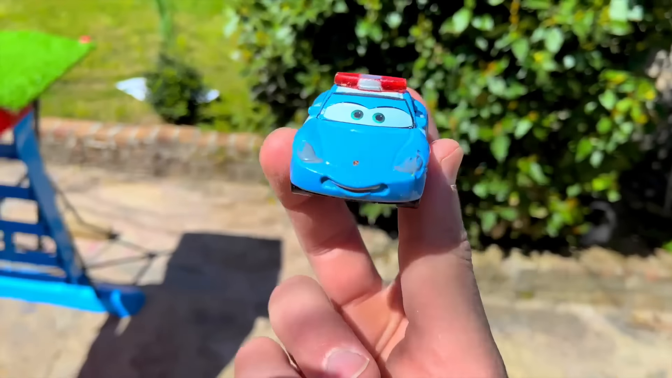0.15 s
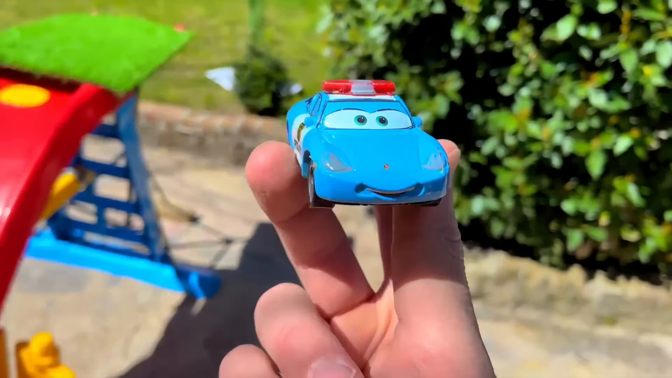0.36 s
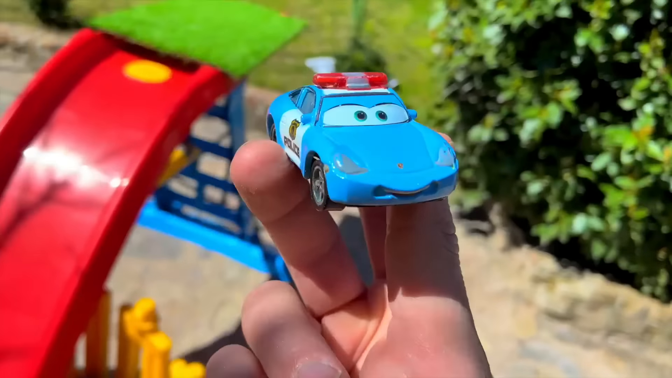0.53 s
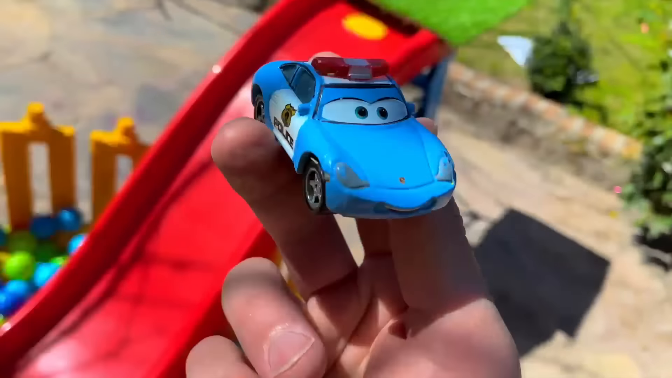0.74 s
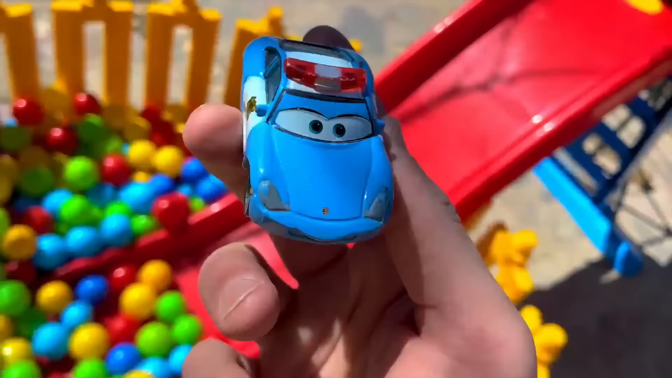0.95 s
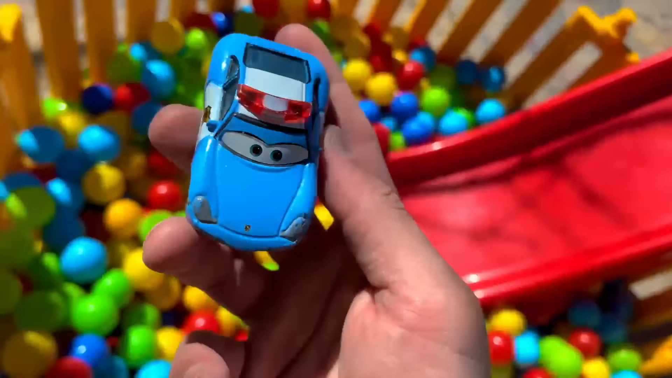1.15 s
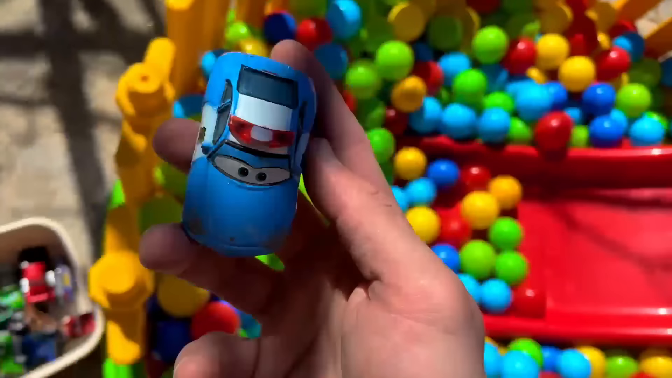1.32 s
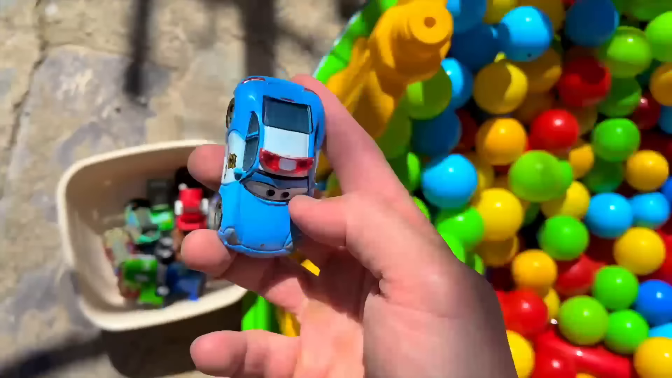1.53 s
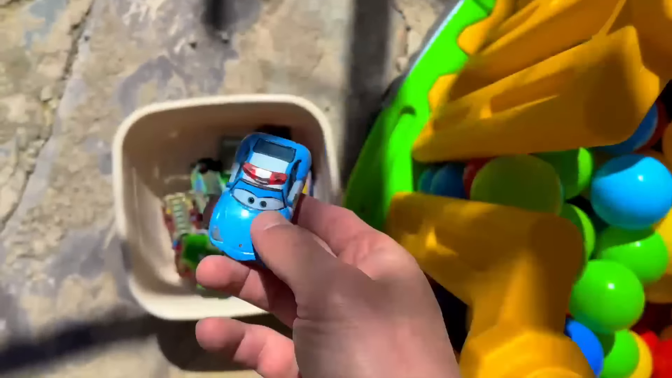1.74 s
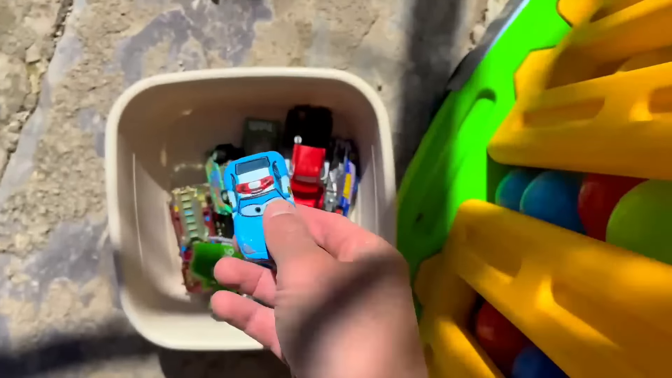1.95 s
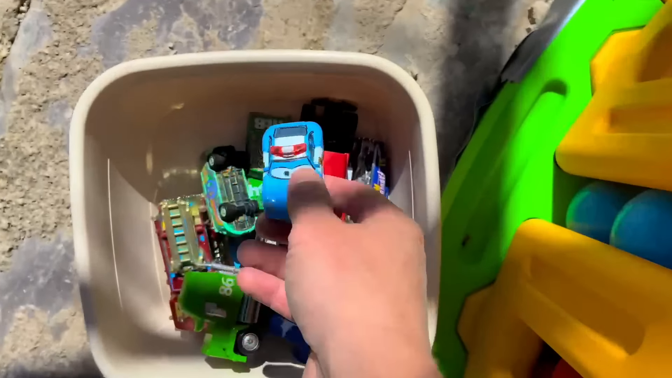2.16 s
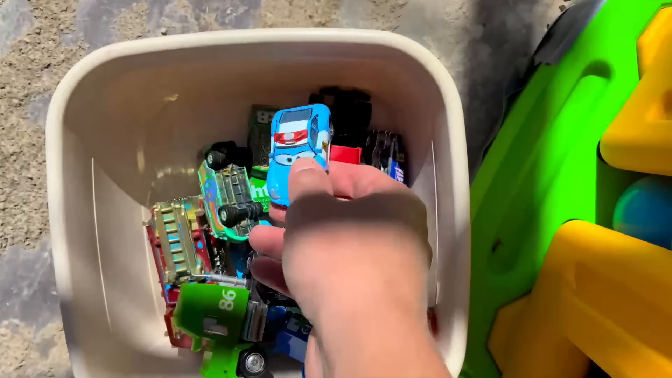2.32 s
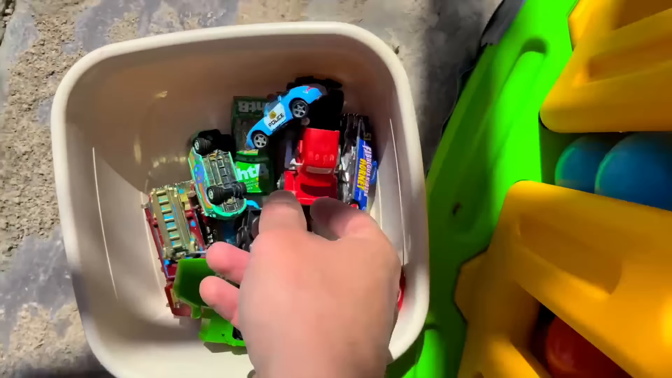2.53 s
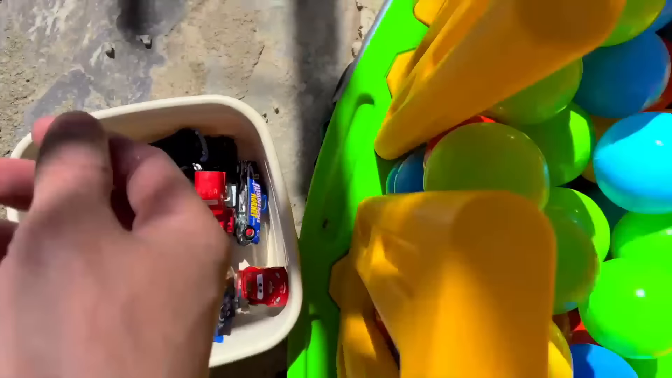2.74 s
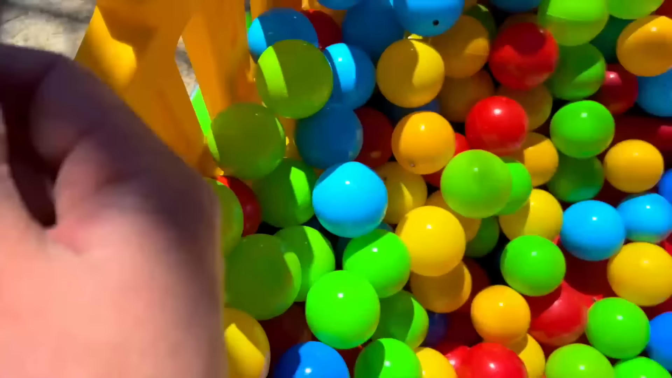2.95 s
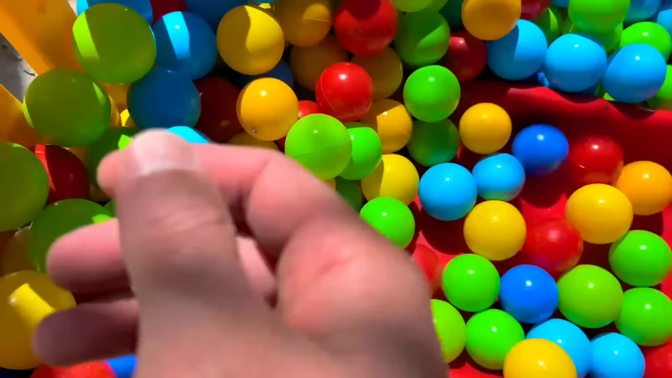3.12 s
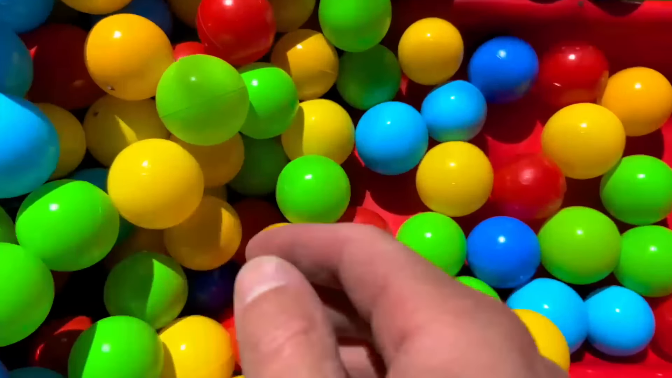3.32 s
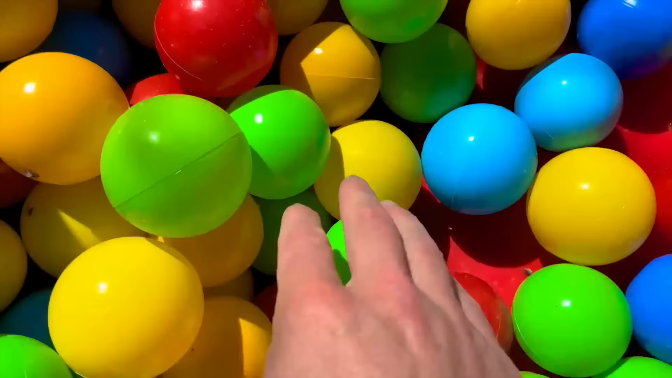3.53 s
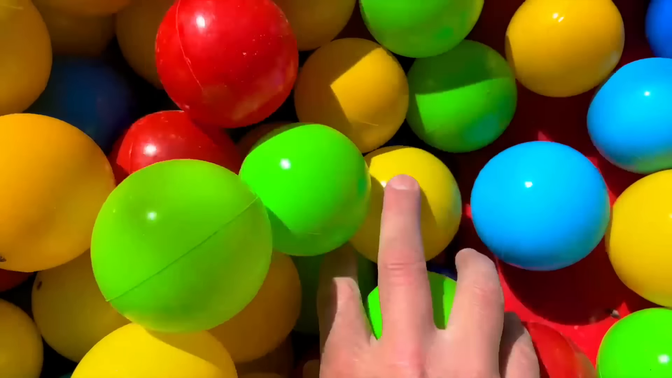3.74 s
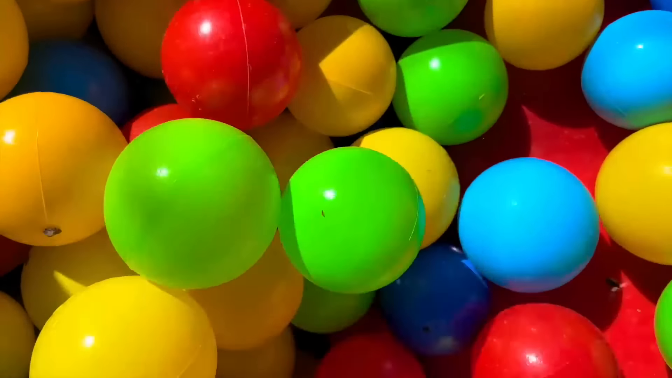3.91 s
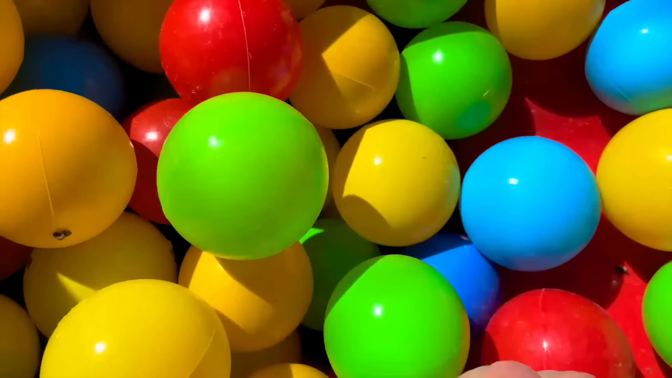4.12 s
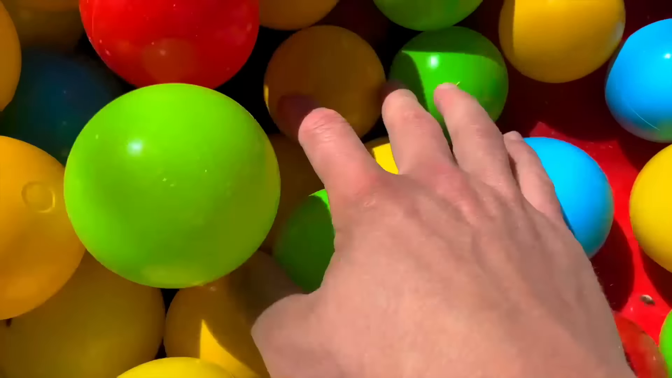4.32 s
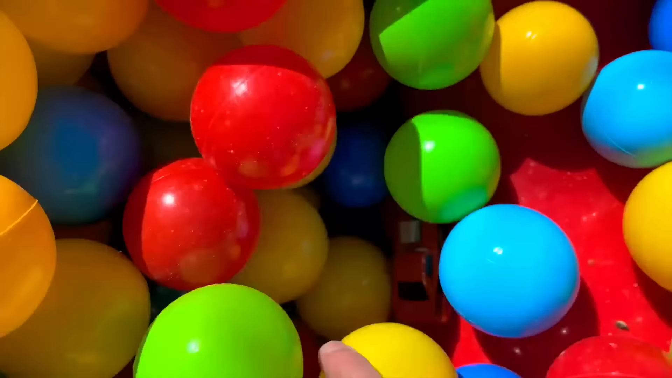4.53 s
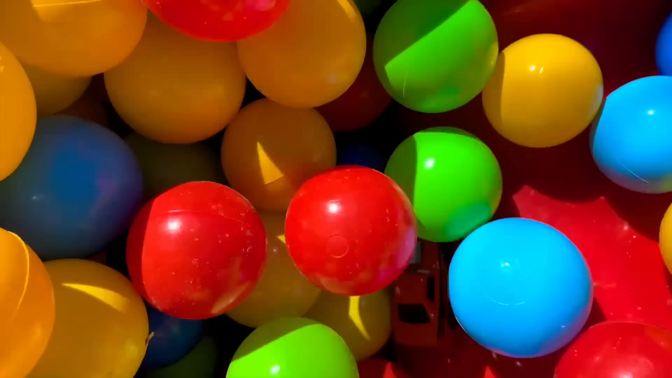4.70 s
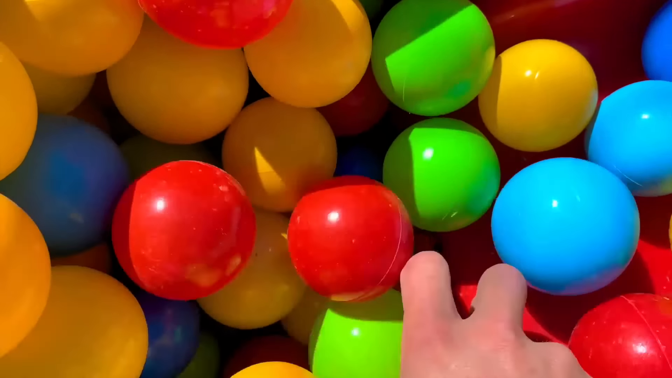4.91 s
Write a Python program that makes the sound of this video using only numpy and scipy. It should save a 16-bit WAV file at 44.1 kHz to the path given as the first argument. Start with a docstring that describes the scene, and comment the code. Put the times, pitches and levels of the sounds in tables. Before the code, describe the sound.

Quiet garden air and breeze open the scene, with a slight sleeve scuff and tiny loose-wheel clicks. A sharp metallic crack precedes a tumbling clatter in a resonant plastic tub. After a short pause comes one dull hollow fence knock with soft bumps, then continuous, irregular knocking and rolling of hollow plastic balls, heard very close, with boomy low swells.

```python
"""A die-cast toy car drops among others in a plastic tub outdoors: noise-excited cracks and decaying modes.
Before the drop the held car clicks in the fingers, as short bursts and rings.
A hand knocks the hollow fence of a ball pit, heard as modes, then digs through the plastic balls:
random collisions clatter, roll and rub, and low swelling tones boom.
Shaped noise makes the breeze, clothes and outdoor hush; gliding tones make faint chirps."""
import sys
import numpy as np
from scipy import signal
from scipy.fft import rfft, irfft, next_fast_len
from scipy.io import wavfile
from scipy.ndimage import uniform_filter1d

SR = 44100
rng = np.random.default_rng(int(sys.argv[2]) if len(sys.argv) > 2 else 0)


def inscribe(sig):
    """Save sig as 16-bit PCM at rate SR to the path in sys.argv[1].

    A 1-D sig is mono; a 2-D sig holds one channel per row.
    Samples are clipped to [-1, 1] before scaling.
    """
    pcm = np.round(np.clip(np.atleast_2d(sig).T, -1, 1) * 32767)
    wavfile.write(sys.argv[1], SR, pcm.astype(np.int16))


N = 223542
TIME = np.arange(N) / SR
RING = np.arange(SR // 4) / SR  # time axis of one struck sound

# Levels in the tables are relative: each layer's gain is applied afterwards.
# Toy car contacts in the tub: (time [s], sharp crack [dB], car body ring [dB], tub ring [dB],
# tub floor thud [dB])
CAR_HITS = [(2.15, -49.5, -60, -49, -61), (2.2598, -15.5, -16.5, -40.5, -48),
            (2.2625, -25, -27.5, -45, -46.5), (2.2852, -28.5, -55, -42.5, -44.5),
            (2.3027, -40, -49, -35, -42), (2.32, -55, -46, -41, -44), (2.372, -39.5, -63, -50, -46),
            (2.394, -54, -60, -37.5, -51.5), (2.403, -49.5, -55, -40, -52.5),
            (2.4166, -32.5, -50, -47.5, -47.5), (2.4425, -31.5, -54.5, -57.5, -44),
            (2.471, -44, -48, -41, -39.5), (2.5215, -50, -48.5, -44, -44), (2.5553, -9, -13, -4.5, -29.5),
            (2.5671, -20.5, -26.5, -14.5, -30), (2.5836, -43, -32.5, -28.5, -33.5),
            (2.593, -42.5, -34, -32.5, -37), (2.6068, -27.5, -26.5, -16, -33),
            (2.6162, -15, -23.5, -13, -23.5), (2.6301, -20.5, -22, -23, -27),
            (2.6345, -28.5, -26, -22.5, -34), (2.642, -24.5, -35, -25, -32.5),
            (2.654, -31, -42.5, -30, -38), (2.6728, -32, -41, -27, -36), (2.677, -32, -46.5, -20.5, -43),
            (2.6844, -24, -30.5, -22.5, -37.5), (2.7275, -40, -48, -22.5, -38),
            (2.7941, -42, -53, -24.5, -37.5), (2.7986, -31, -33.5, -29, -33.5)]
# Spectrum of a sharp crack: (frequency [Hz], density [dB per Hz])
CRACK = [(300, -21), (1500, -16), (2500, -6), (4800, 4.5), (6000, -8.5), (8200, 9.5), (9800, -4),
         (11300, -3.5), (15500, -2)]
# Spectrum of hollow ball shells knocking: (frequency [Hz], density [dB per Hz])
SHELL = [(150, -4), (450, 3.5), (650, 0), (1000, 1), (1280, -4), (1500, -6.5), (2200, -5.5), (3000, -14.5),
         (4300, -18.5), (8000, -20.5), (16000, -43.5)]
# Spectrum of balls rubbing and ticking: (frequency [Hz], density [dB per Hz])
RUB = [(500, -36), (2000, 3.5), (3500, -0.5), (5000, -4.5), (7600, -1.5), (9800, -3), (14000, -3.5),
       (15600, -3)]


def amp(db):
    """Level to amplitude ratio: 20 dB is a factor of ten."""
    return 10 ** (np.asarray(db) / 20)


def unit(x):
    """Normalisation to a root-mean-square value of 1."""
    return x / np.sqrt(np.mean(x ** 2) + 1e-20)


def read(points, hz):
    """Interpolation of a table along a logarithmic frequency axis."""
    f, value = np.transpose(points)
    return np.interp(np.log(hz + 1), np.log(f + 1), value)


def add(mix, s, sound):
    """Superposition: a sound joins the mix from time s."""
    part = mix[:, round(s * SR):][:, :sound.shape[-1]]
    part += sound[..., :part.shape[-1]]


def colour(pair, spectrum):
    """Minimum-phase filtering at unit power gain, with partial coherence between the two channels."""
    # Left-right likeness: (frequency [Hz], correlation [-])
    likeness = [(50, .8), (110, .87), (200, .96), (350, .84), (640, .58), (1400, .55), (3000, .5),
                (6000, .5), (7800, .93), (16000, .97)]
    size = next_fast_len(N + SR // 4, True) // 2 * 2
    hz = abs(np.fft.fftfreq(size, 1 / SR))
    log_gain = np.log(unit(amp(read(spectrum, hz))))
    causal_filter = np.exp(np.conj(signal.hilbert(log_gain)))
    a, b = np.fft.fft(pair, size) * causal_filter
    same = np.clip(read(likeness, hz), -1, 1)
    mid = a * np.sqrt((1 + same) / 2)
    side = b * np.sqrt((1 - same) / 2)
    return np.fft.ifft([mid + side, mid - side]).real[:, :N]


def noise():
    """White noise: two uncorrelated Gaussian channels."""
    return rng.standard_normal((2, N))


def wobble(per_s):
    """Band-limited random modulation of rms 1: per_s random values a second, joined by lines."""
    knots = rng.standard_normal(N // 20)
    return unit(np.interp(TIME * per_s, np.arange(len(knots)), knots))


def bursts(times, levels_db, spectrum, t60, tail_db, tail_t60):
    """High modal density: a blow excites crowded short modes, and nearby walls scatter a weaker tail."""
    out = np.zeros((2, N))
    direct = amp(-60 * RING / t60)
    tail = amp(tail_db - 60 * RING / tail_t60)
    fall = np.hypot(direct, tail) * (1 - np.exp(-RING / .0005))
    for s, db in zip(times, levels_db):
        add(out, s, amp(db) * fall * rng.standard_normal((2, len(RING))))
    return colour(out, spectrum)


def rings(times, levels_db, modes, spread, spot_db):
    """Modal synthesis: each blow lands on another spot and weights the decaying modes anew."""
    hz, mode_db, t60 = np.transpose(modes)[:, :, None]
    envelope = amp(mode_db - 60 * RING / t60) * (1 - np.exp(-RING / .0009))
    decay = envelope * np.exp(2j * np.pi * hz * RING)
    out = np.zeros((2, N))
    for s, db in zip(times, levels_db):
        weight, phase, skew = rng.standard_normal((3, len(modes)))
        angle = np.pi * phase + spread * np.outer([1, -1], skew)  # skew parts the channels
        spot = amp(db) * unit(amp(spot_db * weight)) * np.exp(1j * angle)
        add(out, s, (spot @ decay).imag)
    return out


def thumps(rows, swell_s, lead_s, tail_db, tail_t60):
    """Damped oscillation: a tone swells and dies under a critically damped pulse with a weaker tail."""
    out = np.zeros((2, N))
    u = RING / swell_s
    swell = (u * np.exp(1 - u)) ** 2
    tail = amp(tail_db - 60 * RING / tail_t60) * (1 - np.exp(-u))
    for s, db, hz in rows:
        add(out, s - lead_s, amp(db) * (swell + tail) * np.sin(2 * np.pi * hz * RING))
    return out


def patter(per_s, size_db, fall_s, tone, low_hz, high_hz, count=24):
    """Random point process: collisions of random size, each a click with one of count pitches."""
    out = np.zeros((2, N))
    t = RING[:len(RING) // 4]
    happens = rng.random(N) < per_s / SR
    sizes = amp(size_db * np.minimum(rng.exponential(1, N), 3)) * happens
    pitch = rng.integers(0, count, N)
    tone_fall = amp(-30 * t / fall_s)  # 30 dB in fall_s; the click falls 90 dB
    click_fall = amp(-90 * t / fall_s)
    for k, hz in enumerate(np.geomspace(low_hz, high_hz, count)):
        ring = np.sin(2 * np.pi * (hz * t + rng.random((2, 1))))
        clack = rng.standard_normal((2, len(t))) * click_fall + tone * ring * tone_fall
        out += signal.oaconvolve((sizes * (pitch == k))[None], clack, axes=1)[:, :N]
    slow_power = uniform_filter1d(np.mean(out ** 2, 0), size=4000)
    return unit(out / np.sqrt(slow_power + 1e-9))  # slow level changes evened out


def strokes(starts, lengths, attack_s, release_s):
    """Movement envelopes: a linear attack, a hold, and an exponential release."""
    t = TIME - starts[:, None]
    release = np.exp(-np.maximum(t - lengths[:, None], 0) / release_s)
    return np.clip(t / attack_s, 0, 1) * release


def together(levels_db, envelopes):
    """Incoherent summation: overlapping movements add in power."""
    return np.sqrt(amp(levels_db) ** 2 @ envelopes ** 2)


def toy_cars():
    """Impact excitation: metal cars crack together, their bodies and small parts ring, others rattle."""
    # Axles, wheels and trim: (frequency [Hz], level [dB], T60 [s])
    trim_modes = [(2156, -5.5, 0.051), (5440, -7, 0.031), (5630, -2.5, 0.027), (5880, -4, 0.042),
                  (6240, -1.5, .028), (6970, -6.5, 0.067), (7870, -12, 0.073), (10900, -12.5, .042),
                  (13640, -13, .035)]
    # Car body: (frequency [Hz], level [dB], T60 [s])
    car_modes = [(2260, -8, 0.036), (2950, -18, 0.073), (3400, -12, 0.05), (3620, -9.5, 0.06),
                 (3690, 1, 0.047), (4100, -21, 0.079), (4220, -8, 0.054)]
    # Crowded short modes of the other cars: (frequency [Hz], density [dB per Hz])
    car_rattle = [(500, -32.5), (2300, -12), (2900, -6), (3650, 7.5), (4200, -7.5), (4800, -16.5),
                  (16000, -46)]
    s, crack_db, car_db, _, _ = np.transpose(CAR_HITS)
    crack = amp(-3) * bursts(s, crack_db, CRACK, t60=.028, tail_db=-22, tail_t60=.16)
    trim = amp(-8) * rings(s, crack_db, trim_modes, spread=.3, spot_db=3)
    bodies = amp(-1) * rings(s, car_db, car_modes, spread=1, spot_db=1)
    jolted = amp(-8) * bursts(s, car_db, car_rattle, t60=.03, tail_db=-16, tail_t60=.14)
    return crack + trim + bodies * amp([[-5], [3]]) + jolted  # bodies stronger on the right


def tub():
    """Panel vibration: the plastic tub rings, rattles and thuds under the tumbling car."""
    # Tub: (frequency [Hz], level [dB], T60 [s])
    tub_modes = [(350, -11.5, 0.035), (540, -22, 0.12), (700, -22, 0.1), (972, -19.5, 0.12),
                 (1032, -16, 0.058), (1288, -8, 0.058), (1327, -7.5, 0.075), (1407, -15.5, 0.058),
                 (1715, -3, 0.028), (1780, -6.5, 0.045), (1900, -4, 0.028), (2254, 0, 0.025),
                 (2584, -7, 0.036)]
    # Hollow knocks of walls and floor, each panel with its own note: (time [s], level [dB], frequency [Hz])
    tub_knocks = [(2.556, -25.5, 351), (2.5845, -27, 1120), (2.618, -17.5, 655), (2.619, -22, 1016),
                  (2.626, -18.5, 236), (2.633, -36, 600), (2.635, -22, 250), (2.653, -27.5, 670),
                  (2.675, -27, 263), (2.676, -26.5, 1007), (2.729, -30.5, 1040), (2.797, -30.5, 663)]
    # Rattle of the tub: (frequency [Hz], density [dB per Hz])
    tub_body = [(40, -46), (200, -20), (700, -21), (1300, -5), (2100, -1), (2800, -12), (4500, -13.5),
                (9000, -22.5), (16000, -44)]
    # Thud of its floor: (frequency [Hz], density [dB per Hz])
    tub_floor = [(30, -43.5), (100, -10.5), (190, 4.5), (280, 1.5), (400, -4.5), (600, -0.5), (900, -8.5),
                 (2000, -32), (16000, -77)]
    s, _, _, tub_db, thud_db = np.transpose(CAR_HITS)
    ring = amp(-2.8) * rings(s, tub_db, tub_modes, spread=.5, spot_db=2.5)
    panels = thumps(tub_knocks, swell_s=.002, lead_s=0, tail_db=-10.5, tail_t60=.1)
    rattle = amp(-5) * bursts(s, tub_db, tub_body, t60=.03, tail_db=-17, tail_t60=.3)
    thud = bursts(s, thud_db, tub_floor, t60=.081, tail_db=-12.5, tail_t60=.42)
    return ring + panels + rattle + thud


def dragged_car():
    """Stick-slip friction: the held car scrapes and catches on the others, and the tub floor groans."""
    # Drags: (start [s], length [s], level [dB])
    drags = [(2.257, 0.033, -40), (2.297, 0.048, -47.5), (2.349, 0.1, -46.5), (2.464, 0.071, -50),
             (2.546, 0.0043, -30)]
    # Brief ringing catches: (time [s], level [dB], frequency [Hz])
    catch_rows = [(2.282, -45.5, 2110), (2.301, -47, 2950), (2.311, -44, 2950), (2.32, -43.5, 2950),
                  (2.332, -54, 2940), (2.381, -46, 1570), (2.387, -50.5, 3030), (2.392, -33.5, 1680),
                  (2.403, -38.5, 1900), (2.404, -42.5, 2240), (2.418, -48.5, 2470), (2.473, -33.5, 2050),
                  (2.477, -41, 1690), (2.486, -48.5, 2094), (2.499, -48.5, 1230), (2.521, -39, 1730),
                  (2.549, -34, 3130)]
    # Scrape: (frequency [Hz], density [dB per Hz])
    scrape_colour = [(200, -7.5), (400, 2.5), (540, 10.5), (720, -15), (1000, 1), (1300, -8.5),
                     (1700, -4.5), (2200, -7), (2600, -6), (2950, -1.5), (3400, -11), (4500, -6),
                     (7300, -13), (9500, -16), (13000, -19.5), (15500, -16)]
    # Groan of the tub floor: (frequency [Hz], density [dB per Hz])
    tub_groan = [(100, -14.5), (280, -3), (400, -9.5), (530, 4.5), (680, -10), (1100, -19.5), (4000, -38.5)]
    start, length, drag_db = np.transpose(drags)
    dragging = together(drag_db, strokes(start, length, attack_s=.0088, release_s=.0051))
    slips = patter(per_s=1300, size_db=2.2, fall_s=.028, tone=.3, low_hz=1600, high_hz=3100)
    scrape = amp(-3) * colour(slips, scrape_colour) * dragging
    judder = patter(per_s=500, size_db=2, fall_s=.03, tone=.2, low_hz=300, high_hz=700, count=8)
    groan = amp(-8) * colour(judder, tub_groan) * dragging
    catches = thumps(catch_rows, swell_s=.002, lead_s=0, tail_db=-3.5, tail_t60=.07)
    stick_slip = 1 + .55 * wobble(420)
    return scrape + groan + catches * stick_slip


def handling():
    """Damped impacts: loose wheels click as the car turns in the fingers, which damp its chassis."""
    # Clicks: (time [s], dry tick [dB], axle ring [dB], chassis [dB])
    hand_clicks = [(.752, -47, -75, -59), (.812, -41, -75, -51), (1.1198, -75, -78, -43),
                   (1.456, -39, -56, -44), (1.471, -40.5, -62, -42.5), (1.545, -35, -44, -50),
                   (1.5532, -24, -29, -32), (1.651, -58, -66, -52), (1.674, -40.5, -60, -48),
                   (1.735, -50, -56, -43), (1.805, -40, -74, -47), (2.0184, -40, -48.5, -47)]
    # Wheels and axles: (frequency [Hz], level [dB], T60 [s])
    axle_modes = [(2155, -2.5, 0.04), (5290, -4, 0.019), (6090, 1, 0.028), (6700, 1, .014),
                  (7230, 1, 0.027), (7700, 2, 0.027), (8800, 5, 0.02)]
    # Damped chassis: (frequency [Hz], density [dB per Hz])
    chassis_colour = [(300, -13), (1000, -11), (1600, -2), (2150, 5.5), (2900, -5.5), (3600, -17),
                      (6000, -26), (16000, -40)]
    s, tick_db, axle_db, chassis_db = np.transpose(hand_clicks)
    ticks = bursts(s, tick_db, CRACK, t60=.017, tail_db=-26, tail_t60=.1)
    axles = rings(s, axle_db, axle_modes, spread=.3, spot_db=2)
    chassis = bursts(s, chassis_db, chassis_colour, t60=.022, tail_db=-22, tail_t60=.12)
    return amp(-3) * (ticks + axles + chassis)


def ball_sweeps():
    """Many-body collisions: light hollow balls clatter, roll, rub and boom as the hand digs."""
    # Sweeps of the hand: (start [s], length [s], boom [dB], clatter [dB], rolling [dB], rubbing [dB])
    sweep_rows = [(3.597, 0.074, -31.5, -47.5, -51, -42), (3.73, 0.15, -34, -47, -42, -39),
                  (3.789, 0.11, -19.5, -37, -44, -38), (3.893, 0.058, -25, -39, -46, -38.5),
                  (4.017, 0.14, -26.5, -44, -54, -53), (4.225, 0.051, -26.5, -46.5, -43, -65),
                  (4.271, 0.094, -28, -42.5, -42, -38), (4.333, 0.14, -23, -36.5, -36.5, -35.5),
                  (4.46, 0.078, -21, -32, -37.5, -36.5), (4.518, 0.045, -25.5, -36, -36, -38.5),
                  (4.55, 0.19, -28.5, -41.5, -45.5, -45), (4.728, 0.064, -24, -34.5, -48, -39),
                  (4.805, 0.065, -24, -47, -44, -50), (4.858, 0.095, -20.5, -39.5, -44, -37.5),
                  (4.964, 0.088, -32.5, -42.5, -42.5, -43)]
    # Balls still shifting once disturbed: boom, clatter, rolling, rubbing [dB]
    settle_db = [-36, -60, -48.5, -50]
    # A ball skids drily against its neighbour: (start [s], length [s], level [dB])
    skid_rows = [(3.809, .012, -32.5), (3.96, 0.0088, -41), (4.269, 0.036, -35.5), (4.982, 0.007, -39)]
    # Boom of the heap: (frequency [Hz], density [dB per Hz])
    heap_colour = [(50, -30), (120, -11), (180, -3.5), (220, -3.5), (280, -8), (400, -11.5), (600, -28.5),
                   (1200, -26), (4000, -66)]
    # Shell rolling on shell: (frequency [Hz], density [dB per Hz])
    roll_colour = [(200, -35), (500, 16.5), (800, -2), (1300, -1), (1700, 0), (2200, 0.5), (3100, 0.5),
                   (4000, -13), (8000, -20), (16000, -54)]
    start, length, *levels_db = np.transpose(sweep_rows)
    sweeps = strokes(start, length, attack_s=.027, release_s=.028)
    disturbed = np.maximum.accumulate(sweeps[0])  # stays up after the first sweep
    boom, clatter, roll, rub = (np.hypot(together(db, sweeps), disturbed * amp(rest_db))
                                for db, rest_db in zip(levels_db, settle_db))
    skid_at, skid_length, skid_db = np.transpose(skid_rows)
    skids = together(skid_db, strokes(skid_at, skid_length, attack_s=.0037, release_s=.005))

    jostle = patter(per_s=500, size_db=1.5, fall_s=.043, tone=.064, low_hz=166, high_hz=326)
    knocks = patter(per_s=560, size_db=2, fall_s=.022, tone=1, low_hz=380, high_hz=2600)
    seams = patter(per_s=1100, size_db=2.1, fall_s=.015, tone=.8, low_hz=900, high_hz=3400)
    slips = patter(per_s=3100, size_db=3.5, fall_s=.025, tone=.55, low_hz=2644, high_hz=8010)
    heap = amp(-2.5) * boom * colour(jostle, heap_colour)
    clattering = amp(-3) * clatter * colour(knocks, SHELL)
    rolling = amp(-2.5) * roll * colour(seams, roll_colour)
    friction = amp(-.5) * np.hypot(rub, skids) * colour(slips, RUB)
    return heap * amp([[-1.7], [1.3]]) + (clattering + rolling) * amp([[-.9], [.9]]) + friction


def heap_shoves():
    """Low-frequency pulses: heavy shoves make the heap of balls boom, swelling and dying alike."""
    # Shoves: (time [s], level [dB], frequency [Hz])
    booms = [(3.649, -8.5, 202.5), (3.682, -15.5, 182), (3.822, -5.5, 208), (3.849, -14, 252),
             (3.982, -4.5, 216), (4.041, -9.5, 224), (4.076, -8.5, 225), (4.15, -8, 241), (4.358, -13, 222),
             (4.393, -8, 188), (4.491, -6.5, 212), (4.61, -10.5, 190), (4.76, -8.5, 221),
             (4.832, -11.5, 191), (4.885, -8, 181), (4.922, -7, 220), (4.941, -8, 194), (4.994, -14, 238)]
    shoves = thumps(booms, swell_s=.0061, lead_s=.0018, tail_db=-28, tail_t60=.1)
    return amp(-6.5) * shoves * amp([[-1.7], [1.3]])


def ball_clacks():
    """Shell resonance: single balls clack with a sharp tick and a hollow note of their own."""
    # Clacks: (time [s], sharp tick [dB], hollow shell [dB], shell pitch [Hz])
    clack_rows = [(3.604, -47, -37, 990), (3.611, -35.5, -38, 1104), (3.6825, -43, -30, 793),
                  (3.7465, -35, -32.5, 960), (3.763, -41, -42, 1900), (3.7801, -42, -31, 2070),
                  (3.816, -26, -27.5, 1230), (3.832, -38, -22.5, 1140), (3.877, -24, -24.5, 860),
                  (3.935, -38, -35, 1050), (3.9591, -21, -28.5, 1530), (3.979, -46, -26.5, 810),
                  (4.0352, -50, -35, 493), (4.0483, -30.5, -31.5, 1043), (4.116, -18.5, -52, 2620),
                  (4.128, -45, -38, 2660), (4.147, -23, -23, 1244), (4.1495, -29, -35, 1840),
                  (4.233, -31, -32, 920), (4.2448, -25.5, -29.5, 1270), (4.253, -38, -31.5, 1090),
                  (4.263, -48, -40, 1800), (4.28, -37, -39, 1300), (4.305, -30, -27.5, 1220),
                  (4.319, -42, -35, 1090), (4.351, -33, -27, 1220), (4.3564, -30, -23, 835),
                  (4.398, -41, -34, 1010), (4.415, -41, -31, 1230), (4.465, -26, -27, 1140),
                  (4.474, -36, -37, 2780), (4.4909, -27, -34, 944), (4.502, -38, -21.5, 1314),
                  (4.547, -39, -29.5, 2770), (4.553, -37, -30, 1140), (4.594, -30, -29.5, 920),
                  (4.607, -45, -34, 700), (4.63, -36, -29, 2070), (4.7301, -31, -23.5, 1090),
                  (4.772, -23.5, -28, 1000), (4.782, -30, -35, 1190), (4.8351, -25, -36, 993),
                  (4.877, -30, -26, 1584), (4.921, -34, -33, 1100), (4.941, -31.5, -24, 931),
                  (4.9463, -23, -23, 850), (4.99, -20, -26, 1490), (5.009, -46, -27.5, 1000)]
    at, tick_db, shell_db, shell_hz = np.transpose(clack_rows)
    ticks = amp(-2.5) * bursts(at, tick_db, RUB, t60=.02, tail_db=-19, tail_t60=.08)
    clacks = amp(5) * bursts(at, shell_db, SHELL, t60=.022, tail_db=-22, tail_t60=.09)
    notes = zip(at, shell_db, shell_hz)
    pocks = amp(1) * thumps(notes, swell_s=.00078, lead_s=0, tail_db=-9, tail_t60=.075)
    return (clacks + pocks) * amp([[-.9], [.9]]) + ticks


def fence():
    """Hollow-body resonance: the fence rings when knocked, then bumps dully as the arm leans over."""
    # Knocks: (time [s], level [dB])
    fence_hits = [(3.1685, -10.5), (3.1875, -27), (3.211, -33)]
    # Fence: (frequency [Hz], level [dB], T60 [s])
    fence_modes = [(495, 1.5, 0.055), (606, -5.5, 0.056), (815, -9, 0.05), (838, -3, 0.075),
                   (1170, -21, 0.046), (1320, -13.5, 0.074), (1600, -37, 0.045), (1970, -25, 0.038),
                   (2480, -29, .03)]
    # Dull wall around the modes: (frequency [Hz], density [dB per Hz])
    fence_wall = [(60, -38), (200, -25), (520, 17), (900, 1.5), (1500, -4), (2500, -18), (3300, -30),
                  (15000, -45)]
    # Soft low bumps against the pit wall: (time [s], level [dB], frequency [Hz])
    bump_rows = [(3.184, -28, 145), (3.209, -32, 262), (3.282, -28, 141), (3.308, -26.5, 110),
                 (3.345, -28, 115)]
    s, db = np.transpose(fence_hits)
    knock = amp(-7) * rings(s, db, fence_modes, spread=.42, spot_db=1.5)
    wall = amp(-5) * bursts(s, db, fence_wall, t60=.04, tail_db=-16, tail_t60=.24)
    bumps = thumps(bump_rows, swell_s=.0036, lead_s=.0005, tail_db=-13, tail_t60=.15)
    return knock + wall + bumps


def breeze():
    """Turbulent pressure: low-frequency noise flutters and gusts at the close microphone."""
    # Strength of the breeze: (time [s], level [dB])
    breeze_level = [(0, -53.5), (.3, -41), (1.05, -44), (1.33, -62), (2.05, -51), (2.5, -54.5),
                    (2.8, -48.5), (3.55, -42.5), (4.4, -37), (5.07, -41)]
    # Single gusts: (time [s], peak level [dB])
    gust_rows = [(.28, -58), (0.386, -34), (0.527, -32.5), (0.672, -27), (0.733, -35.5), (.8, -40.5),
                 (0.859, -38), (0.951, -31.5), (1.03, -38.5), (1.123, -33.5), (2.78, -40), (3.08, -40),
                 (3.321, -28), (3.68, -30.5), (3.951, -26.5), (4.3, -29), (4.41, -28)]
    # Breeze: (frequency [Hz], density [dB per Hz])
    wind_colour = [(15, -42.5), (35, -11), (58, 5.5), (100, 1), (160, -11), (260, -17.5), (500, -32.5),
                   (1500, -68), (16000, -115)]
    # Gust, brighter than the breeze: (frequency [Hz], density [dB per Hz])
    gust_colour = [(15, -24), (35, -2), (60, 8.5), (100, 3.5), (160, -4.5), (260, -16.5), (500, -34),
                   (1500, -55), (16000, -115)]
    at, gust_db = np.transpose(gust_rows)
    gusts = together(gust_db, np.exp(-((TIME - at[:, None]) / .016) ** 2))  # 16 ms half length
    flutter_db = 2 * wobble(33)
    strength = amp(np.interp(TIME, *np.transpose(breeze_level)) + flutter_db)
    wind = strength * colour(noise(), wind_colour) + gusts * colour(noise(), gust_colour)
    return wind * amp([[-1], [0]])


def clothes():
    """Friction noise: cloth swishes with a grainy level as the arm moves."""
    # Swishes: (middle [s], half length [s], level [dB], treble level [dB])
    swishes = [(.58, 0.32, -64.5, -82), (0.792, 0.052, -63.5, -69), (1.48, 0.15, -62, -59),
               (1.686, 0.069, -96, -62.5), (1.919, 0.14, -62, -56.5), (2.22, 0.11, -89, -63),
               (3.144, 0.17, -61.5, -62), (3.373, 0.044, -48.5, -60), (3.463, 0.077, -60.5, -69)]
    # Body of the swish: (frequency [Hz], density [dB per Hz])
    cloth_colour = [(150, -9), (500, 3.5), (850, 10), (1300, 2), (2000, -2.5), (2700, -16.5), (3600, -8.5),
                    (7500, -24.5), (15500, -49)]
    # Its treble: (frequency [Hz], density [dB per Hz])
    cloth_hiss = [(500, -33), (2200, 8.5), (4000, -5.5), (7500, -0.5), (10000, -9.5), (13500, -6),
                  (15500, 1)]
    middle, half, db, treble_db = np.transpose(swishes)
    swells = np.exp(-abs((TIME - middle[:, None]) / half[:, None]) ** 3)
    body = amp(db) @ swells * colour(noise(), cloth_colour)
    treble = amp(treble_db) @ swells * colour(noise(), cloth_hiss)
    grain_db = 1.8 * wobble(160) + 1.3 * wobble(22)
    return (body + treble) * amp(grain_db)


def sleeve():
    """Granular friction: a sleeve scuffs once, hollower than the other rustles."""
    # Scuff: (start [s], length [s], level [dB])
    scuff = [(0.793, 0.13, -54.5)]
    # Its spectrum: (frequency [Hz], density [dB per Hz])
    scuff_colour = [(240, -24), (520, -7), (760, -4.5), (1130, -4), (1400, -5.5), (1750, -17), (2150, -9.5),
                    (2800, -9), (3400, -17.5), (4560, -20.5), (7000, -24.5), (9500, -32), (12000, -27),
                    (15600, -40)]
    start, length, db = np.transpose(scuff)
    rubbing = together(db, strokes(start, length, attack_s=.03, release_s=.018))
    fibres = patter(per_s=2600, size_db=1.5, fall_s=.02, tone=.3, low_hz=700, high_hz=3000, count=8)
    return rubbing * colour(fibres, scuff_colour)


def bird():
    """Frequency modulation: faint gliding chirps, probably a bird, blurred by distance."""
    # Chirps: (middle [s], half length [s], level [dB], middle frequency [Hz], rise [Hz per s])
    chirps = [(0.524, .04, -80, 4600, 7000), (1.18, 0.05, -78, 4450, 2000)]
    out = np.zeros((2, N))
    for middle, half, db, hz, rise in chirps:
        t = TIME - middle
        glide = np.sin(2 * np.pi * (hz + .5 * rise * t) * t)
        out += amp(db) * np.exp(-(t / half) ** 2) * wobble(600) * glide
    return out


def hush():
    """Diffuse background: far outdoor noise, slowly varying in level."""
    # Outdoor air: (frequency [Hz], density [dB per Hz])
    air_colour = [(30, 9), (150, -5.5), (400, -7.5), (900, -8.5), (1600, -16), (2500, -25), (4500, -37.5),
                  (8000, -39), (16000, -49)]
    return amp(-55.5) * colour(noise(), air_colour) * amp(wobble(7))


def scene():
    """Linear superposition of all sources in the open air."""
    car = toy_cars() + tub() + dragged_car() + handling()
    pit = ball_sweeps() + heap_shoves() + ball_clacks() + fence()
    return car + pit + breeze() + clothes() + sleeve() + bird() + hush()


def record(dry):
    """Output stage: interchannel phase, a low cut, a clipping ceiling and a band limit."""
    # Stereo widening, as phase between the channels: (frequency [Hz], lead of the left [rad])
    widening_phase = [(20, 0), (1900, 0), (2600, -.4), (3700, -.1), (5300, -.4), (6800, .2), (8350, 2.9),
                      (9600, 3.3), (11300, 6.1), (13200, 6.5), (14800, 9.3), (16000, 9.5)]
    low_cut_hz, edge_hz, ceiling = 41, 15720, .9
    size = next_fast_len(N + SR // 4)
    lead = read(widening_phase, np.fft.rfftfreq(size, 1 / SR))
    turn = np.exp(.5j * np.outer([1, -1], lead))  # half to each channel
    wide = irfft(rfft(dry, size) * turn, size)[:, :N]
    low_cut = signal.butter(2, low_cut_hz, "highpass", fs=SR, output="sos")
    lean = signal.sosfilt(low_cut, wide)
    limited = np.clip(lean, -ceiling, ceiling)
    band_limit = signal.firwin(401, edge_hz, window=("kaiser", 9), fs=SR)
    return signal.oaconvolve(limited, band_limit[None], "same")


dry = scene()
out = record(dry)
inscribe(out)
```